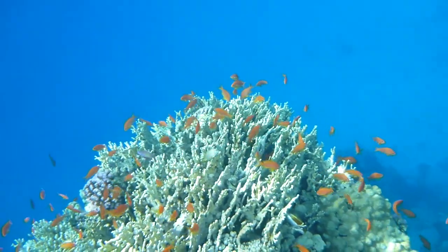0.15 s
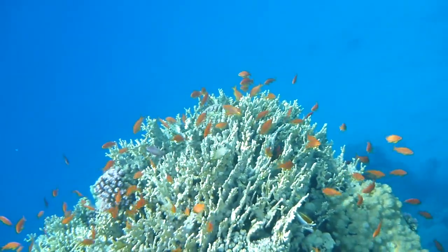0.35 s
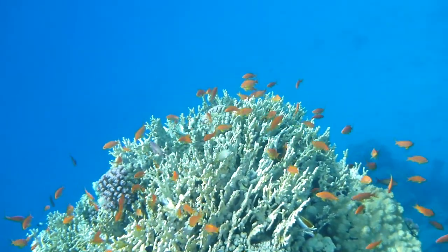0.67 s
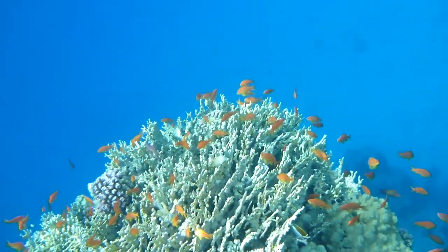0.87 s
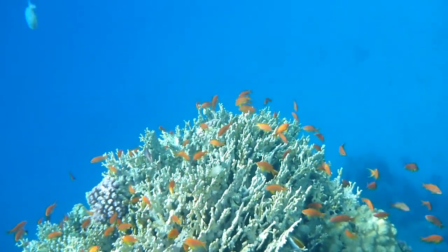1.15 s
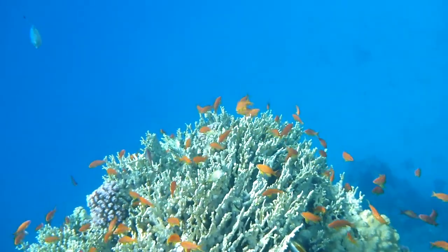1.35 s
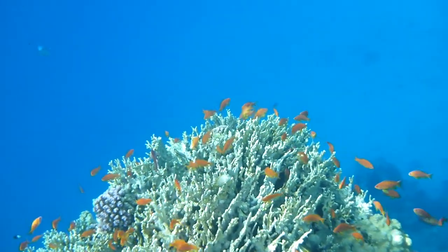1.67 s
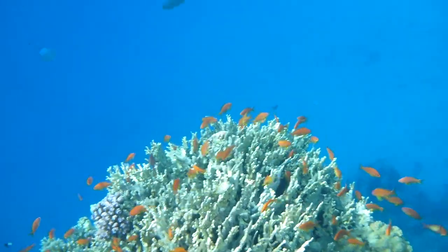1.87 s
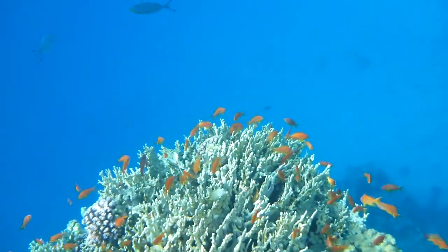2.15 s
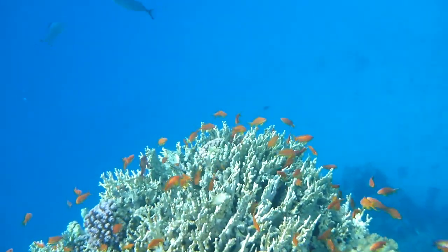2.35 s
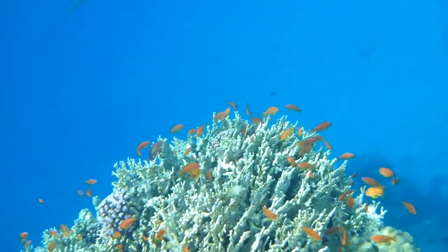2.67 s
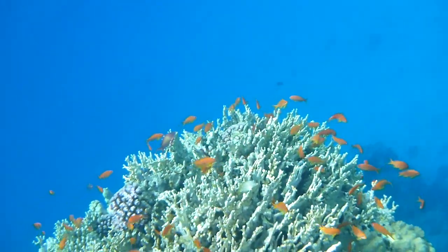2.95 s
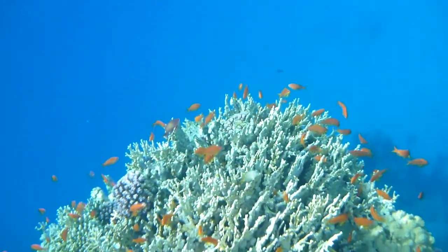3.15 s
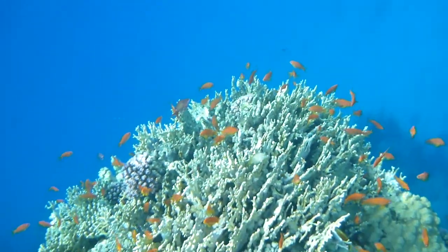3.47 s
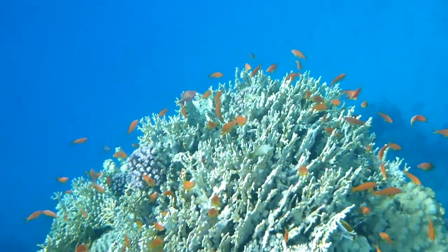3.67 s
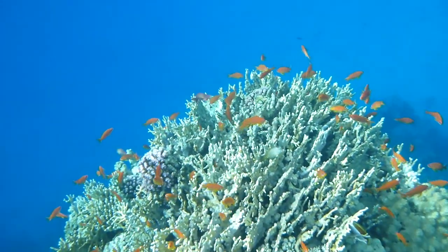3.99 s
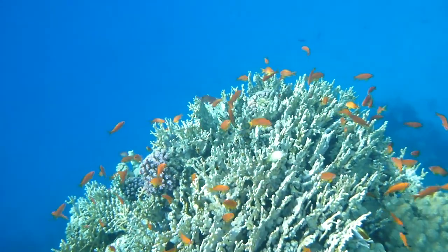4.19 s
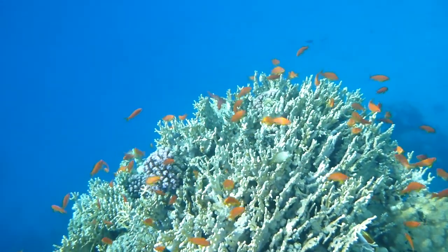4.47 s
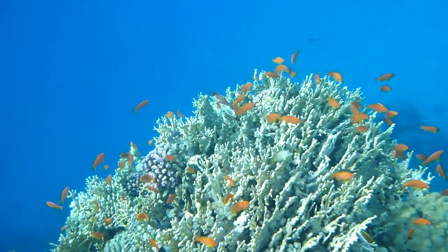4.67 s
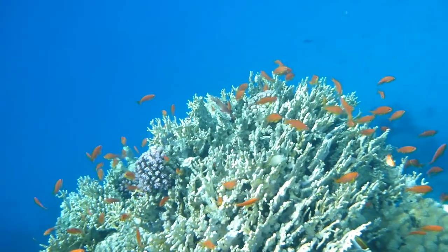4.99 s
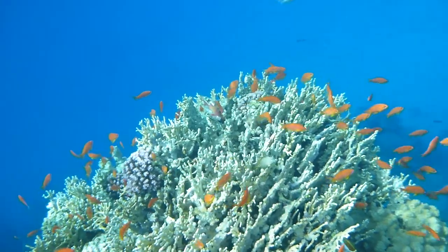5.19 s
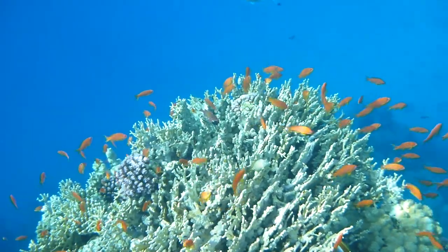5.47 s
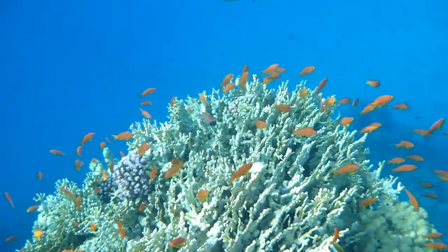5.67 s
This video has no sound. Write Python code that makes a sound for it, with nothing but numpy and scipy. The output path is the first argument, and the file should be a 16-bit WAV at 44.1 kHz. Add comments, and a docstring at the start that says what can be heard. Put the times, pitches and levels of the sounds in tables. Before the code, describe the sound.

For about six seconds, snapping shrimp crackle underwater on a coral reef, heard through microphones inside a housing. Close snaps are sharp, irregular clicks and pops, many each second, varying in strength and ringing very briefly. Countless distant ones blend into a fine, flickering fizz, with a soft, low wash of water steady underneath. A few faint, low thumps pass between 0.6 and 1.4 seconds, and again near 3.5, 5.3 and 5.6 seconds. At about 1.8 seconds the loudest snap distorts with a slight knock, and the whole sound dips, recovering within about half a second. Other strong pops stand out near 0.9, 2.4, 3.0, 4.2 and 5.0 seconds, the one at 3.0 the hardest of these. From about 4 seconds, small quiet pings, all near one pitch, like tiny bubbles breaking free, dot the crackle, which continues to the end.

```python
"""On a coral reef, with a camera's two microphones shut in an underwater housing.
From the start snapping shrimp crackle: near ones pop and ring briefly in the housing, far ones merge
into a fizz over the wash of the water. A few low thumps pass, the first at 0.6 s. Near 1.8 s the
loudest snap overloads the recorder and makes its gain duck. From about 4 s small pings join in."""
import sys
import numpy as np
from scipy import signal
from scipy.fft import rfft, irfft
from scipy.io import wavfile
from scipy.ndimage import minimum_filter1d

SR = 44100
rng = np.random.default_rng(int(sys.argv[2]) if len(sys.argv) > 2 else 0)


def store_pcm(level_fs):
    """Save levels as 16-bit WAV."""
    pcm = np.round(np.clip(level_fs, -1, 1) * 32767).astype(np.int16)
    wavfile.write(sys.argv[1], SR, np.atleast_2d(pcm).T)


N = 257103
ECHO_SAMPLES = 1024   # a snap's echoes die within this span


def from_db(db):
    """Decibels to gain."""
    return 10 ** (np.asarray(db) / 20)


def rms_one(x):
    """Scale to rms 1."""
    return x / np.sqrt(np.mean(x ** 2) + 1e-20)


def add(track, start_s, sound):
    """Mix a short sound into a track."""
    at = int(np.clip(round(start_s * SR), 0, N - 1))
    track[at:at + len(sound)] += sound[:N - at]


def colour(x, spectrum):
    """Filter by a causal (minimum-phase) click of peak 1, shaped by (Hz, dB) points."""
    size = 4 * ECHO_SAMPLES
    hz, db = np.transpose(spectrum)
    grid_hz = np.maximum(np.arange(size // 2 + 1) * SR / size, 1)
    gain = from_db(np.interp(np.log(grid_hz), np.log(hz), db))
    cepstrum = irfft(np.log(gain))
    cepstrum[1:size // 2] *= 2
    cepstrum[size // 2 + 1:] = 0
    click = irfft(np.exp(rfft(cepstrum)))
    return signal.fftconvolve(x, click / np.abs(click).max())[:N]


def tone_burst(hz, cycles, steep, size=512):
    """A tone that swells to height 1 over the given cycles, then dies away."""
    turns = np.arange(size) * hz / SR
    age = turns / cycles
    return (age * np.exp(1 - age)) ** steep * np.sin(2 * np.pi * turns)


def water_wash():
    """The steady low wash of the water all around."""
    # Each row: frequency in Hz, relative noise density in dB.
    spectrum = [(20, -21), (50, -10.5), (100, 0), (190, 2.5), (420, 1), (550, -2.5), (720, -0.5),
                (950, -7.5), (1400, -7.5), (3000, -34)]
    return rms_one(colour(rng.standard_normal(N), spectrum))


def busy_db(time_s):
    """How busy the distant shrimp are at a given time."""
    # Each row: time in seconds, level in dB about the usual.
    activity = [(0.0, 5.5), (0.2, 1), (0.85, -0.5), (1.5, 0.5), (2.35, 0), (2.8, -1.5), (3.4, 3), (3.75, 0),
                (4.1, 2), (4.7, 0.5), (5.83, -0.5)]
    return np.interp(time_s, *np.transpose(activity))


def fizz_flicker(per_s):
    """The fizz flickers in level: a random swell of spread about 1."""
    knots = rng.standard_normal(int(per_s * N / SR) + 2)
    return np.interp(np.arange(N) / SR * per_s, np.arange(len(knots)), knots)


def far_shrimp(per_s, spread_db, hiss_db, flicker_db):
    """Thousands of far snaps, each a tiny pitched tick, the farthest merged into a hiss."""
    # The fizz at the microphones. Each row: frequency in Hz, relative gain in dB.
    spectrum = [(900, -42.5), (1300, -16.5), (1600, 2), (2100, 1.5), (2400, 3.5), (3400, 3), (4100, -6),
                (5600, -6), (7100, -4), (7900, -8.5), (10700, -9), (11800, -78), (12600, -20), (15500, -23)]
    pitches = np.geomspace(1500, 13000, 16)
    sizes = from_db(spread_db * np.minimum(rng.exponential(1, N), 3.2))
    signs = rng.choice([-1, 1], N)
    clicks = sizes * signs * (rng.random(N) < per_s / SR)
    pitch_index = rng.integers(0, len(pitches), N)
    ticks = np.zeros(N)
    for k, hz in enumerate(pitches):
        band = signal.butter(2, [.8 * hz, 1.25 * hz], "band", fs=SR, output="sos")
        ticks += signal.sosfilt(band, clicks * (pitch_index == k) + 1e-18)
    hiss = from_db(hiss_db) * rng.standard_normal(N)
    fizz = rms_one(colour(rms_one(ticks) + hiss, spectrum))
    swell_db = busy_db(np.arange(N) / SR) + flicker_db * fizz_flicker(per_s=18)
    return from_db(swell_db) * fizz


def low_thumps():
    """Soft thumps of a cycle or two, perhaps fish."""
    # Each row: start in seconds, level in dB, pitch in Hz.
    thumps = [(0.609, -30, 140), (0.7055, -24, 567), (1.1222, -18, 195), (1.2215, -25, 143),
              (1.3408, -25, 181), (3.540, -28.5, 201), (5.328, -29, 386), (5.574, -27.5, 400)]
    out = np.zeros(N)
    for start_s, db, hz in thumps:
        add(out, start_s, from_db(db) * tone_burst(hz, cycles=1, steep=5.8, size=4096))
    return out


def small_pings(pitch_hz, faint_count, faint_from_s):
    """Pings like bubbles of one size breaking free, with fainter ones at random in between."""
    # The clear pings. Each row: start in seconds, level in dB.
    pings = [(3.997, -25), (4.51, -25), (4.748, -25.5), (4.828, -29), (5.069, -23), (5.389, -25),
             (5.71, -22.5)]
    clear = [(start_s, db, pitch_hz) for start_s, db in pings]
    when, size, detune = rng.random((faint_count, 3)).T
    faint_s = faint_from_s + when * (N / SR - faint_from_s)
    faint_db = -36 + 6 * size
    faint_hz = pitch_hz * (1 + .08 * (detune - .5))
    out = np.zeros(N)
    for start_s, db, hz in clear + list(zip(faint_s, faint_db, faint_hz)):
        add(out, start_s, from_db(db) * tone_burst(hz, cycles=3, steep=1.4, size=4096))
    return out


def scatter(sound, echo_db, echo_s, count):
    """Coral and housing walls return a snap many times within milliseconds, colouring each unevenly."""
    lag_s = echo_s * rng.exponential(1, count)
    taps = np.minimum(lag_s * SR + 8, ECHO_SAMPLES - 1).astype(int)
    paths = np.zeros(ECHO_SAMPLES)
    paths[taps] = from_db(echo_db) * np.exp(-.5 * lag_s / echo_s) * rng.choice([-1, 1], count)
    paths[0] = 1
    heard = np.convolve(sound, paths)
    # the paths share the energy of the snap
    return heard * np.sqrt(np.sum(sound ** 2) / np.sum(heard ** 2))


def claw_snaps(rows, cycles):
    """Each claw collapses a cavitation bubble: a pitched pop, a higher crack, and their echoes."""
    out = np.zeros(N)
    for start_s, pop_db, pop_hz, crack_db, crack_hz in rows:
        # more of a faint snap arrives by way of the coral
        indirect_db = np.clip(-.5 * pop_db, 0, 9)
        # the very hardest pops have a sharper front
        rise = cycles * (1 - np.clip(pop_db / 16, 0, .45))
        pop = from_db(pop_db) * tone_burst(pop_hz, cycles=rise, steep=2.2 * rise)
        crack = tone_burst(crack_hz, cycles=.8, steep=1.7)
        crack[0] += from_db(0.5)   # sharp opening spike
        crack *= from_db(crack_db - 3)
        add(out, start_s, scatter(pop, echo_db=indirect_db - 22.5, echo_s=.0026, count=24))
        add(out, start_s + .0004, scatter(crack, echo_db=-16, echo_s=.0015, count=22))
    return out


def mid_distance_shrimp(count, faintest_db, spread_db, loudest_db):
    """Shrimp a little way off snap at random, each at its own pitch: the fainter, the more of them."""
    when, size, pop_pitch, crack_pitch, brightness = rng.random((count, 5)).T
    start_s = when * N / SR
    reach = 1 - np.exp((faintest_db - loudest_db) / spread_db)
    db = faintest_db - spread_db * np.log(1 - reach * size) + busy_db(start_s)
    pop_hz = 1800 * (3900 / 1800) ** pop_pitch
    crack_hz = 4000 * (11000 / 4000) ** crack_pitch
    tilt_db = 14 * (brightness - .5)   # some are mostly crack, others mostly pop
    pop_db = db - np.maximum(tilt_db, 0)
    crack_db = db + 1.5 + np.minimum(tilt_db, 0)
    return claw_snaps(zip(start_s, pop_db, pop_hz, crack_db, crack_hz), cycles=1.1)


def near_shrimp():
    """The shrimp closest to the microphones, heard snap by snap."""
    # Each row: start in seconds, relative pop level in dB, pop pitch in Hz,
    # relative crack level in dB, crack pitch in Hz.
    snaps = [(0.0386, -29, 3470, -25, 5000), (0.0897, -32, 2100, -21, 5400), (0.1692, -20, 2330, -27, 7100),
             (0.2305, -15, 2910, -13.5, 4900), (0.2709, -20.5, 3080, -26, 7200),
             (0.3745, -15, 2660, -17, 7540), (0.3803, -15.5, 2160, -4, 6800), (0.4101, -4, 2070, -29, 5500),
             (0.4476, -19.5, 2880, -29, 6500), (0.5997, -10, 2820, -13.5, 4900),
             (0.6336, -26, 2040, -19, 5560), (0.7368, -11, 2470, -52, 6300), (0.7479, -13, 1910, -28, 6160),
             (0.8212, -4.5, 2080, -30, 4970), (0.892, -14.5, 2820, -11, 5670),
             (0.9301, -19, 3230, -12, 9400), (0.9386, -3, 2520, -11, 7900), (0.9739, -20, 2900, -24, 6800),
             (0.9816, -22, 2200, -30, 10600), (0.9959, -13, 2450, -47, 6600),
             (1.0776, -23, 2720, -32, 6060), (1.0951, -20.5, 3500, -31, 4240),
             (1.1441, -14, 2880, -16, 4800), (1.3369, -20, 2500, -41, 7600),
             (1.3879, -22, 2590, -18.5, 6740), (1.4652, -8, 2870, -51, 3500),
             (1.4891, -14, 1900, -23, 4900), (1.6926, -10.5, 2470, -28, 7600),
             (1.7525, -12, 2440, -24, 3980), (1.7616, -12, 3020, -38, 5260), (1.7813, 4.5, 1668, 3, 4400),
             (1.9094, -13.5, 2780, -3, 6560), (1.9965, -23.5, 2820, -24, 5540),
             (2.1747, -17, 2870, -40, 6200), (2.3716, -8.5, 3220, -8, 5130), (2.3815, -3, 2620, -9.5, 9050),
             (2.4397, -21, 3040, -22, 5300), (2.5536, -22, 1910, -22, 10300),
             (2.566, -14.5, 2300, -13.5, 9900), (2.768, -20.5, 2290, -40, 5130),
             (2.916, -13, 2780, -38, 5470), (2.9425, -16, 2420, -22, 8500), (3.0074, -14, 2400, -14, 8800),
             (3.0123, 4.5, 2435, -10.5, 6800), (3.2888, -19.5, 2800, -41, 7800),
             (3.3323, -30, 2930, -10, 9150), (3.3646, -16, 2210, -36, 9100), (3.4344, -8, 2270, -23, 7840),
             (3.4587, -8.5, 2780, -13.5, 6540), (3.8644, -9.5, 2380, -19, 7100),
             (3.8749, -11, 2250, -28, 8100), (3.9234, -16, 2700, -9.5, 6430),
             (4.0234, -18, 2600, -27, 7150), (4.0934, -22.5, 2680, -15.5, 8900),
             (4.1442, -4.5, 2100, -42, 7300), (4.1744, -21, 2260, -30, 4670),
             (4.2077, -5.5, 2020, -45, 6300), (4.215, -1, 2950, -7.5, 4900),
             (4.3392, -14.5, 2170, -23, 8400), (4.4428, -26, 3040, -22, 5960),
             (4.4794, -16.5, 2960, -13.5, 4900), (4.8583, -18, 2900, -40, 5300),
             (4.8929, -18.5, 2580, -24, 5970), (4.9879, -2.5, 2255, -12.5, 7860),
             (5.0032, -20, 2980, -18, 6400), (5.0898, -5, 2770, -16.5, 5500),
             (5.1844, -17, 2630, -19, 7100), (5.2153, -18, 2940, -22, 6250), (5.3867, -29, 2820, -19, 9800),
             (5.596, -18.5, 2520, -18, 7740), (5.6834, -22, 2720, -17, 7300),
             (5.7888, -15, 2680, -44, 5250)]
    return claw_snaps(snaps, cycles=1.4)


def housing_walls(shrimp, loss_db, longest_ring_s):
    """Snaps pass through the walls, which ring on until the water damps them."""
    # What the walls let through. Each row: frequency in Hz, relative gain in dB.
    transmission = [(300, 2), (1000, -9), (1250, -10), (1600, 3.5), (2400, -1), (3500, 6), (4200, 0.5),
                    (5000, 3), (5700, 2.5), (7200, 5), (7800, -2.5), (10800, 1.5), (11600, -19.5),
                    (15500, -12.5)]
    # Wall modes. Each row: pitch in Hz, gain in dB, seconds to fall 60 dB (capped below).
    modes = [(1513, -31, 0.0082), (2147, -40, 0.033), (2520, -69, 0.0062), (2940, -62, 0.0018),
             (3726, -46, 0.039), (4900, -44, 0.017), (7000, -70, 0.009)]
    inside = from_db(-loss_db) * colour(shrimp, transmission)
    t = np.arange(2 * ECHO_SAMPLES) / SR
    out = inside.copy()
    for hz, db, t60 in modes:
        ring = from_db(db - 60 * t / min(t60, longest_ring_s)) * np.sin(2 * np.pi * hz * t)
        out += signal.fftconvolve(inside, ring)[:N]
    return out


def housing_notches(sound):
    """The housing swallows two narrow bands."""
    # Each row: centre in Hz, width in Hz.
    notches = [(2890, 333), (7850, 110)]
    for hz, width_hz in notches:
        sound = signal.lfilter(*signal.iirnotch(hz, hz / width_hz, fs=SR), sound)
    return sound


def gain_control(x, threshold_db, slope, release_s):
    """A peak over the threshold pulls the recorder's gain down; it creeps back afterwards."""
    peak_db = 20 * np.log10(np.abs(x).max(axis=0) + 1e-9)
    over_db = np.maximum(peak_db - threshold_db, 0)
    fade = np.arange(N) / SR / release_s
    held_db = np.exp(np.maximum.accumulate(np.log(over_db + 1e-9) + fade) - fade)
    pole = np.exp(-1 / (0.012 * SR))   # 12 ms attack
    return x * from_db(-slope * signal.lfilter([1 - pole], [1, -pole], held_db))


def overload(x):
    """Peaks flatten at full scale; a hard one jolts the amplifier off its bias, which adds a knock."""
    excess = np.tanh(2 * np.maximum(np.abs(x) - 1.4, 0))
    held = -minimum_filter1d(-excess, size=201, origin=100)
    jolt = np.maximum(np.diff(held, prepend=0), 0)
    knock = signal.sosfilt(signal.butter(2, [330, 1400], "band", fs=SR, output="sos"), jolt)
    flattened = x / (1 + x ** 6) ** (1 / 6)
    return np.clip(flattened - from_db(15.5) * knock, -1, 1)


def scene():
    """All sound reaches both microphones alike through the housing."""
    wash = from_db(-43) * water_wash()
    far = from_db(-43) * far_shrimp(per_s=2600, spread_db=4.5, hiss_db=-1, flicker_db=2.9)
    near = near_shrimp()
    middle = mid_distance_shrimp(count=480, faintest_db=-35.5, spread_db=5, loudest_db=-21.5)
    crackle = housing_walls(near + middle, loss_db=2.94, longest_ring_s=.016)
    pings = small_pings(pitch_hz=1612, faint_count=16, faint_from_s=3.95)
    sound = housing_notches(wash + far + low_thumps() + pings + crackle)
    return np.array([sound, sound])


def record(dry):
    """The camera's recorder: gain control, overload, and a top cut at 15.8 kHz."""
    ducked = gain_control(dry, threshold_db=-0.5, slope=0.54, release_s=0.34)
    top_cut = signal.ellip(10, .1, 80, 15800, fs=SR, output="sos")
    return signal.sosfilt(top_cut, overload(ducked))


dry = scene()
out = record(dry)
store_pcm(out)
```